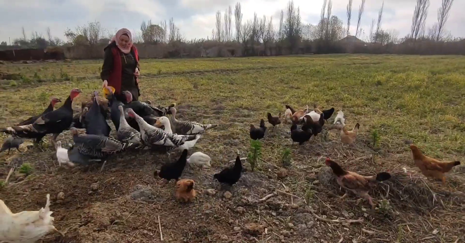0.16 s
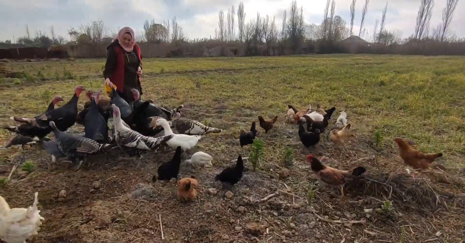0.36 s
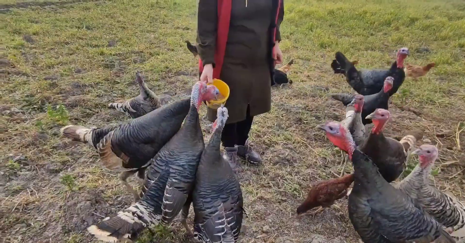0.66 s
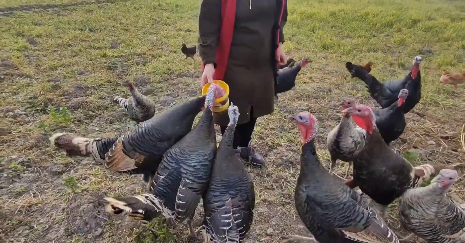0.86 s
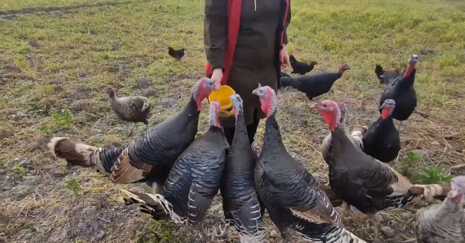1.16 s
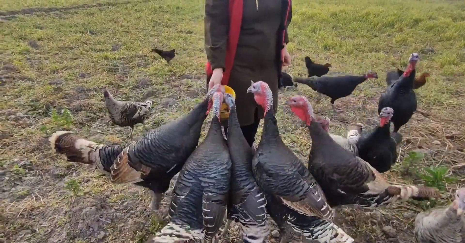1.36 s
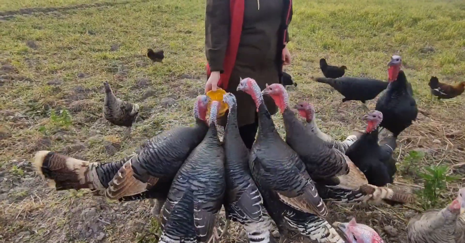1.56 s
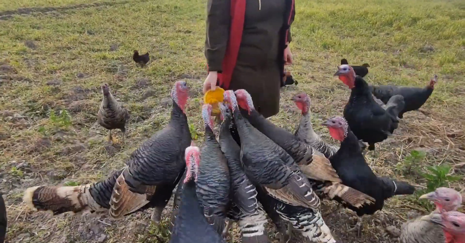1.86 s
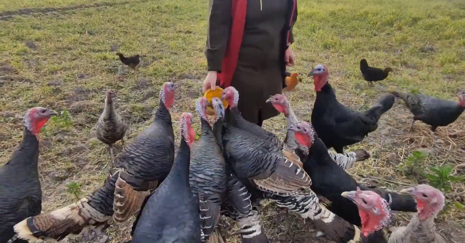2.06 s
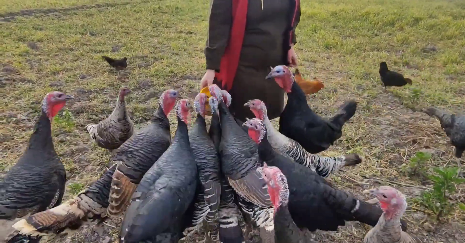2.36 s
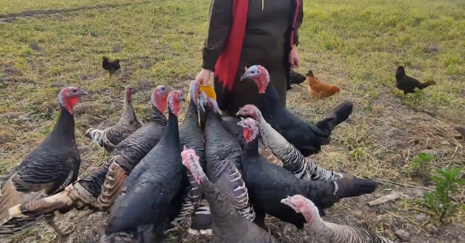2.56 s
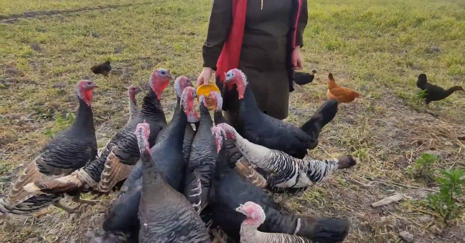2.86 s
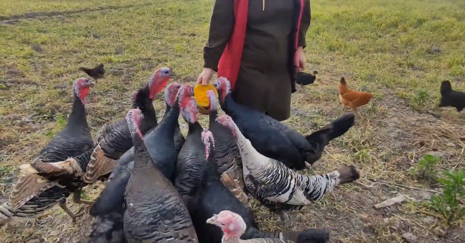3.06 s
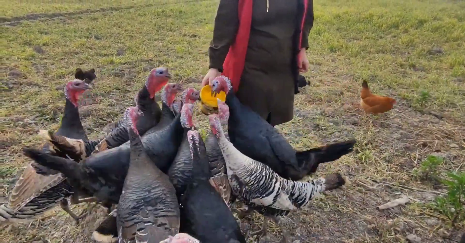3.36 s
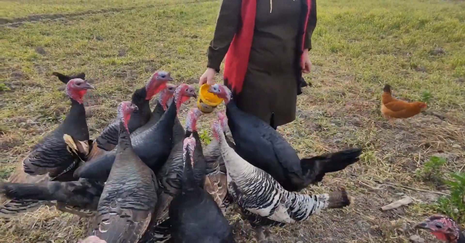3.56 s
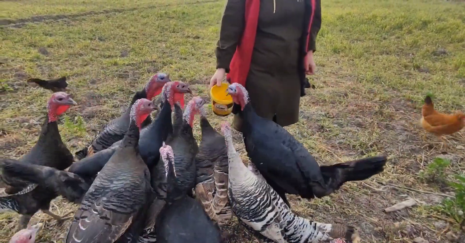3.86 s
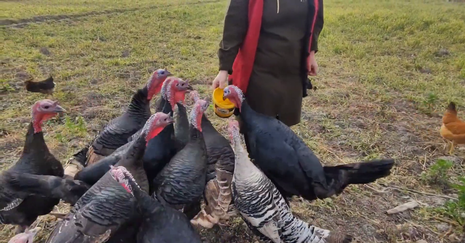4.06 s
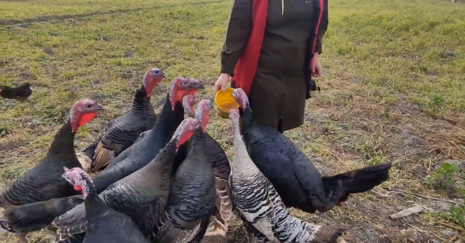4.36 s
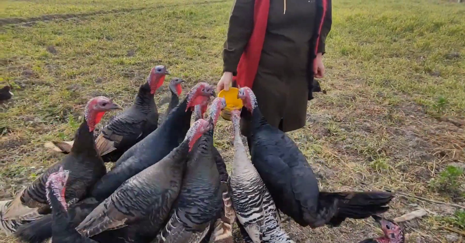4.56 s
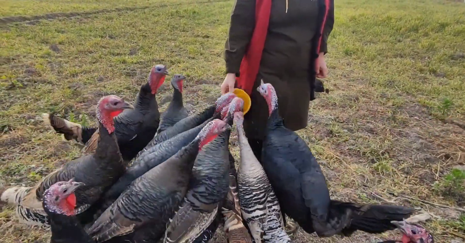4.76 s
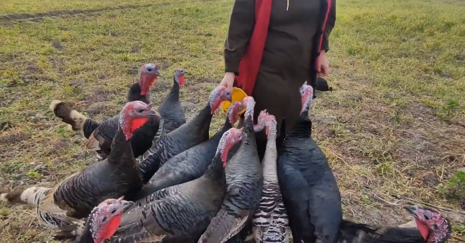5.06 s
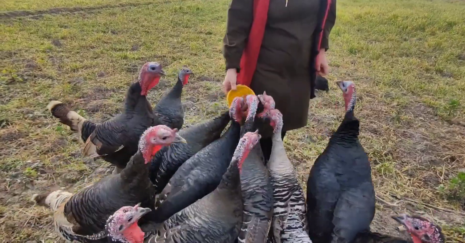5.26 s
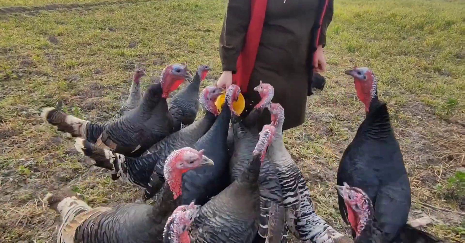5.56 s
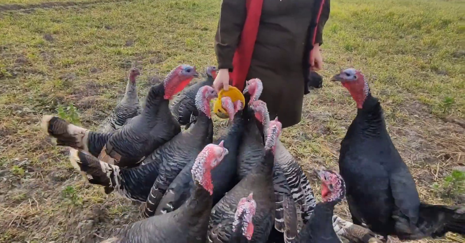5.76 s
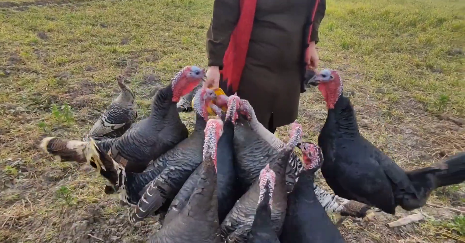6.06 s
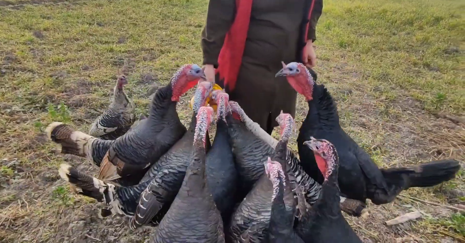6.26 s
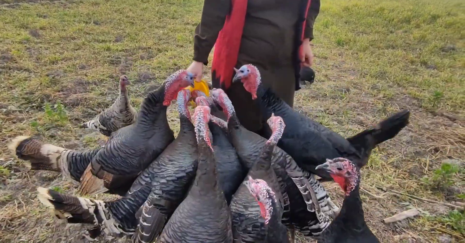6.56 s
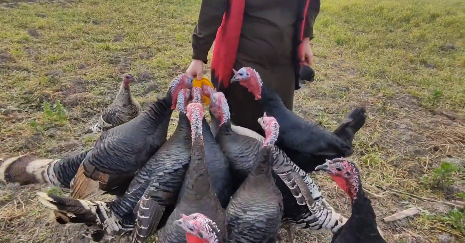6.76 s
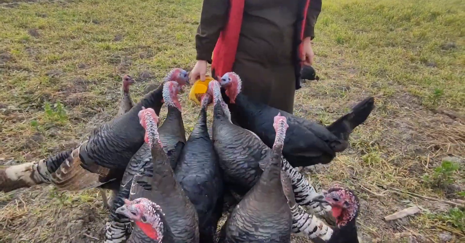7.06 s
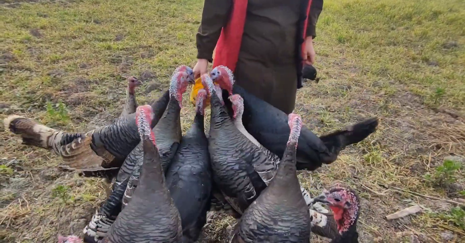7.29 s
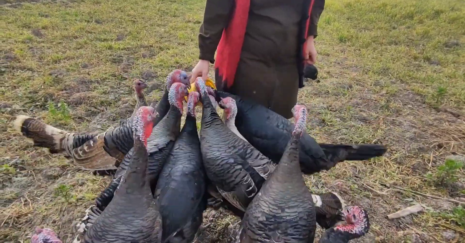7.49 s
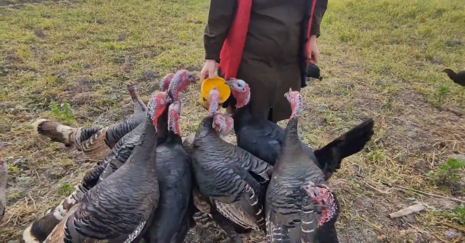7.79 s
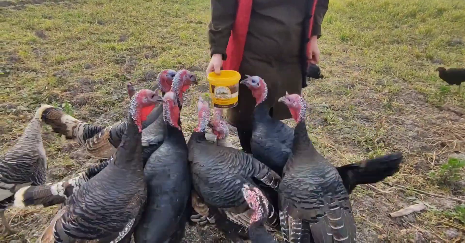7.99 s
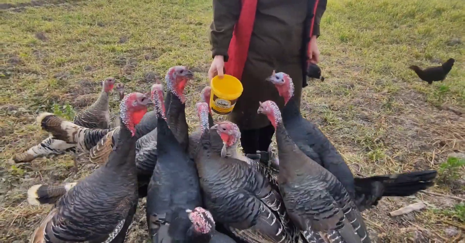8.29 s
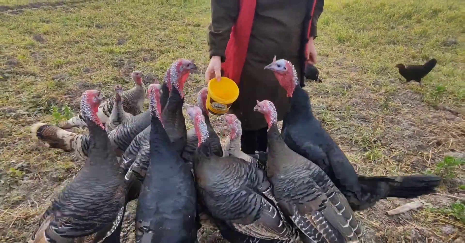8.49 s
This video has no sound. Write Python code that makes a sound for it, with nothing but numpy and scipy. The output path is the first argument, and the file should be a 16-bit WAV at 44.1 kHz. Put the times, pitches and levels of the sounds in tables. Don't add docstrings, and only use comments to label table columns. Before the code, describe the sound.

Close, wide stereo view of turkeys feeding in the open. Brief bright chirps, whistles, barked notes and throaty yelps overlap in bursts, strongest around two, five and six and a half seconds, thinning later. A few low clucks, sharp plastic pecks and dull thuds punctuate them. Scratchy dry-grass scuffs and feather rustle continue over low wind, a passing far motor and very faint high whines.

```python
import sys
import numpy as np
from scipy import signal
from scipy.fft import rfft, irfft
from scipy.io import wavfile
from scipy.ndimage import uniform_filter1d, map_coordinates

SR = 44100
rng = np.random.default_rng(int(sys.argv[2]) if len(sys.argv) > 2 else 0)


def transcribe(u):
    v = np.clip(np.atleast_2d(u).T, -1, 1)
    q = np.round(v * 32767).astype(np.int16)
    wavfile.write(sys.argv[1], SR, q)


def undo_db(level):
    steps = np.asarray(level, float) / 20
    return 10 ** steps


N = 380583

# (frequency [Hz], level [dB])
THROAT_TONE = [(380, -32), (640, -7), (1400, 3), (2100, -7), (3200, -17), (4200, -13), (7000, -60)]


def unit(x):
    return x / np.sqrt(np.mean(x ** 2) + 1e-20)


def along(points, hz):
    f, v = np.transpose(points)
    return np.interp(np.log(hz + 1), np.log(f + 1), v)


def wobble(rate, size):
    knots = rng.standard_normal(int(size * rate / SR) + 4)
    return map_coordinates(knots, [np.arange(size) * rate / SR])


def smooth_patch(x, bins, frames):
    return uniform_filter1d(uniform_filter1d(x, size=bins, axis=-2), size=frames, axis=-1)


def during(spans, t):
    return sum(1. * (t > a) * (t < b) for a, b in spans)


def rush(spectrum, patchy_db, roam_ms=0):
    # (frequency [Hz], correlation [0-1])
    likeness = [(60, .97), (300, .9), (1200, .5), (4000, .65)]
    hz, _, z = signal.stft(rng.standard_normal((2, N)), SR, nperseg=1024)
    patches = unit(smooth_patch(rng.standard_normal(z.shape[1:]), 14, 4))
    turn = np.arccos(np.clip(along(likeness, hz), -1, 1))[:, None] / 2
    z = z * undo_db(along(spectrum, hz)[:, None] + patchy_db * patches) * [np.cos(turn), np.sin(turn)]
    roam = roam_ms / 1000 * wobble(rate=4, size=N + SR)[::512][:z.shape[2]]
    shift = np.exp(1j * np.pi * hz[:, None] * roam)
    pair = np.array([(z[0] + z[1]) * shift, (z[0] - z[1]) / shift])
    return unit(signal.istft(pair, SR, nperseg=1024)[1][:, :N])


def add(out, s, sound):
    at = max(round(s * SR), 0)
    out[:, at:at + sound.shape[1]] += sound[:, :N - at]


def turkeys():
    # (time [s], length [s], start pitch [Hz], level [dB])
    rises = [(2.898, 0.021, 686, -30.5), (2.864, 0.017, 880, -27.5), (.47, 0.031, 850, -27),
             (.268, 0.02, 628, -37.5), (1.243, 0.024, 657, -34.5), (3.727, 0.02, 853, -24),
             (4.818, 0.017, 639, -30.5), (.533, 0.024, 860, -24.5), (.763, 0.04, 626, -33.5),
             (.87, 0.047, 813, -36.5), (1.098, 0.039, 694, -26), (3.668, 0.023, 888, -22.5),
             (6.322, 0.013, 1100, -22), (1.577, 0.035, 810, -19), (2.105, 0.022, 870, -15),
             (2.119, 0.021, 880, -22.5), (2.609, 0.023, 718, -33), (3.017, 0.026, 923, -18.5),
             (3.766, 0.038, 905, -19), (3.985, 0.024, 916, -18.5), (4.035, 0.023, 893, -20.5),
             (5.095, 0.029, 868, -14.5), (5.148, 0.027, 904, -13), (5.631, 0.026, 712, -30),
             (5.816, 0.042, 1096, -23), (6.137, 0.018, 613, -25.5), (6.406, 0.033, 898, -15),
             (6.465, 0.029, 942, -15), (8.4, 0.023, 882, -17), (8.464, 0.02, 900, -18.5)]
    lifts = [(.708, 0.035, 714, -26), (4.785, 0.028, 994, -35), (1.76, 0.014, 1450, -18.5),
             (2.0, 0.028, 994, -15), (2.055, 0.025, 941, -13), (2.717, 0.038, 870, -34),
             (2.821, 0.043, 714, -24), (2.902, 0.036, 990, -23), (8.545, 0.078, 1325, -39.5),
             (3.93, 0.038, 1052, -20.5), (1.315, 0.035, 1010, -22.5), (5.277, 0.019, 1086, -25),
             (6.344, 0.033, 1025, -15.5), (6.533, 0.026, 1076, -23), (8.098, 0.02, 694, -33.5)]
    flicks = [
        (3.063, 0.022, 877, -19),
        (5.886, 0.024, 804, -23.5),
        (7.164, 0.0159, 752, -27.5),
        (7.71, 0.018, 753, -38.5),
    ]
    soars = [
        (3.195, 0.02, 1022, -24),
        (7.92, 0.012, 664, -35),
    ]
    flats = [(.03, 0.098, 2330, -38), (1.448, .044, 1220, -16), (2.35, 0.069, 1510, -40.5),
             (2.692, 0.033, 1090, -35), (2.943, 0.028, 797, -31), (4.307, 0.06, 1730, -38),
             (5.13, 0.022, 1195, -24), (2.774, 0.054, 760, -28), (2.818, 0.0092, 1250, -20),
             (2.961, 0.022, 1040, -17), (3.71, 0.022, 1305, -31), (4.865, 0.049, 1532, -24),
             (5.293, 0.06, 1584, -32), (7.015, 0.013, 1300, -20.5), (8.378, .02, 1160, -35),
             (6.36, 0.12, 771, -38.5)]
    drops = [
        (6.488, 0.049, 2300, -26),
        (7.297, 0.024, 1770, -29),
        (4.4, .022, 1600, -34),
        (2.998, 0.05, 4100, -31.5),
    ]
    puts = [
        (4.097, 0.031, 657, -37.5),
        (4.358, 0.018, 733, -24.5),
        (4.417, 0.024, 718, -27.5),
        (4.476, 0.021, 710, -23.5),
        (5.276, 0.0042, 710, -24),
        (6.837, 0.014, 778, -28),
        (6.999, 0.013, 766, -24.5),
        (8.314, 0.0071, 707, -30.5),
    ]
    falls = [(1.66, 0.071, 1634, -25), (0.218, 0.041, 1860, -42), (1.802, 0.052, 2870, -30.5),
             (4.971, 0.062, 790, -33), (1.996, 0.045, 1630, -21), (2.124, 0.067, 1800, -27),
             (2.16, 0.015, 1180, -18.5), (2.803, 0.041, 1540, -15.5), (2.966, 0.026, 1324, -16),
             (5.04, 0.027, 1600, -36), (5.18, 0.03, 887, -27), (7.973, 0.063, 1650, -48),
             (6.518, 0.033, 1095, -27.5), (6.741, 0.024, 1560, -25.5), (8.2, 0.08, 862, -34)]
    # (time [s],
    # length [s], start pitch [Hz], end pitch [Hz], level [dB])
    crossings = [(0.173, 0.017, 1650, 1600, -37), (.24, 0.054, 1765, 1575, -40.5),
                 (0.293, 0.073, 1297, 652, -43.5), (0.342, 0.06, 1475, 1276, -44.5),
                 (0.396, 0.016, 970, 960, -35), (0.458, 0.012, 1045, 1770, -23.5),
                 (0.494, 0.017, 657, 577, -40), (0.664, 0.03, 750, 1080, -41),
                 (0.672, 0.036, 1260, 777, -40), (0.803, 0.034, 1335, 1540, -41),
                 (1.766, 0.0061, 2630, 2920, -34), (0.946, 0.019, 1925, 2010, -34),
                 (0.933, 0.019, 910, 980, -43), (.996, 0.014, 940, 980, -30),
                 (1.042, 0.018, 894, 960, -33.5), (1.062, 0.017, 1390, 1590, -29),
                 (1.093, 0.045, 1396, 1560, -31.5), (1.216, 0.012, 1280, 1330, -38),
                 (1.42, 0.038, 1840, 1540, -31), (1.492, 0.028, 1140, 1100, -30),
                 (1.575, 0.034, 1695, 1910, -32), (1.612, 0.011, 1640, 1570, -22),
                 (1.616, 0.019, 970, 1180, -22), (1.639, 0.015, 877, 750, -19.5),
                 (1.643, 0.0092, 1510, 1470, -27.5), (1.652, 0.01, 1120, 1420, -23),
                 (1.676, 0.025, 905, 1000, -31.5), (1.67, 0.02, 1770, 1730, -29.5),
                 (1.762, 0.037, 590, 920, -34), (1.956, 0.013, 1560, 1790, -26),
                 (1.971, 0.038, 2070, 1910, -35), (1.968, 0.029, 1060, 980, -27.5),
                 (2.081, 0.0087, 1280, 1600, -27), (2.089, 0.0078, 1180, 1830, -22),
                 (2.104, .03, 1880, 2020, -37), (2.157, 0.02, 880, 1270, -27),
                 (2.194, 0.014, 1090, 804, -31), (1.53, .024, 870, 1060, -12.5),
                 (4.932, 0.013, 2940, 2870, -30), (5.313, .045, 3160, 3010, -41.5),
                 (3.627, 0.04, 1046, 1163, -29.5), (3.72, 0.1, 2500, 2370, -40),
               (3.844, 0.041, 2540, 2850, -31.5), (3.914, 0.012, 1850, 1760, -32),
               (3.912, 0.017, 833, 950, -33), (3.93, .02, 2550, 2540, -37), (4.215, 0.03, 705, 945, -38),
               (4.345, 0.017, 950, 890, -36), (4.42, 0.027, 1670, 1830, -27),
               (4.443, 0.012, 1190, 1410, -31), (4.499, 0.012, 1260, 1225, -27),
               (4.498, 0.016, 1680, 1850, -31.5), (4.977, 0.033, 1497, 1330, -30.5),
               (5.07, .025, 1174, 1130, -39), (5.19, 0.028, 1360, 1250, -36),
               (5.22, 0.031, 1074, 1030, -47), (5.396, 0.018, 1460, 706, -33),
               (8.217, 0.03, 1566, 1260, -37), (8.424, 0.01, 1500, 900, -32), (6.07, 0.014, 724, 970, -31),
               (6.072, 0.026, 1140, 1940, -34.5), (6.099, 0.027, 2380, 2210, -34),
               (6.108, 0.039, 2010, 1480, -33), (6.151, 0.035, 1534, 1110, -27),
               (6.336, 0.021, 1894, 1420, -31), (6.46, 0.032, 1997, 2130, -28),
               (6.464, 0.01, 1260, 1440, -26), (6.53, 0.039, 852, 640, -31.5),
               (6.948, 0.012, 1440, 1150, -31), (7.058, 0.019, 1574, 1250, -21.5),
               (7.13, 0.031, 1410, 1290, -34), (7.231, 0.023, 1604, 1200, -26),
               (2.815, 0.027, 2020, 2220, -32), (2.68, 0.025, 2700, 2430, -42),
               (2.96, .045, 3580, 3550, -30)]
    # (time [s], length [s], pitch [Hz], level [dB], sag [octaves])
    hooked = [(0.797, 0.058, 729, -33.5, 0.073), (1.366, 0.046, 1048, -16.5, -0.049),
              (1.816, 0.12, 950, -26, 0.099), (1.831, 0.15, 619, -29.5, -0.22),
              (2.64, 0.054, 1070, -36.5, -0.19), (3.434, 0.16, 991, -26.5, 0.11),
              (3.817, 0.095, 704, -22.5, -0.63), (4.238, 0.08, 1098, -24, -0.052),
              (6.198, 0.14, 1640, -37, 0.44), (4.829, 0.14, 939, -24, 0.089),
              (5.001, 0.063, 1046, -15, 0.18), (5.658, 0.09, 1190, -29, 0.22),
              (6.156, 0.17, 1056, -19.5, 0.21), (8.124, 0.15, 1030, -26.5, 0.14),
              (8.306, 0.064, 1133, -17.5, 0.29)]
    dropped = [(0.117, 0.089, 2305, -37.5, 0.38), (1.608, 0.13, 768, -34.5, 0.19),
               (1.767, 0.059, 1956, -24, 0.1), (1.828, 0.094, 1764, -22.5, 0.19),
               (7.026, 0.05, 1640, -25.5, 0.11), (7.074, 0.071, 1267, -35, 0.44),
               (5.303, 0.11, 1436, -31, 0.61), (6.597, 0.15, 1138, -34.5, 0.36),
               (6.852, 0.1, 1250, -28.5, 0.28), (6.959, 0.074, 1210, -32.5, 0.094),
               (7.026, 0.074, 691, -32, -0.0021), (7.17, 0.06, 1432, -29.5, 0.28),
               (7.226, 0.036, 798, -29, 0.07)]

    out = np.zeros((2, N))
    middle = 0.49
    # notes, end pitch over start pitch, overtone slope dB/octave, swell lateness
    kinds = [(rises, 1.38, -8, 1.47), (lifts, 1.12, -8, 1.47), (flicks, 2.01, -11, 1.47),
             (soars, 2.7, -11, 1.03), (flats, 0.93, -8, 1.03), (drops, 0.63, -11, 1.03)]
    for notes, glide, slope_db, late in kinds:
        for s, length, hz, db in notes:
            add(out, s, chirp(length, hz, hz * glide, db, lead(s), .025, slope_db, late))
    for s, length, hz, db in puts:
        add(out, s, chirp(length, hz, hz * 1.086, db, lead(s), .025, -5.5, late=1, second_db=5.5))
    for s, length, hz, end_hz, db in crossings:
        add(out, s, chirp(length, hz, end_hz, db, middle * lead(s), .03, -11, late=1.03))
    for s, length, hz, db in falls:
        end_hz = hz * 2 ** (-8.5 * length)
        add(out, s, chirp(length, hz, end_hz, db, middle * lead(s), .025, -11, late=1.03))
    for s, length, hz, db, sag in hooked:
        add(out, s, yelp(length, hz, db, sag, turn=0.55, turn_s=0.0184, swell_db=-6.5,
                         slope_db=-8, lead_ms=lead(s)))
    for s, length, hz, db, sag in dropped:
        add(out, s, yelp(length, hz, db, sag, turn=-0.533, turn_s=0.0288, swell_db=3,
                         slope_db=-12, lead_ms=lead(s)))
    return open_beak(out)


def lead(s):
    # (time [s], left lead [ms])
    places = [(0, -0.2), (.55, -0.46), (.7, 0.39), (1.15, 0.49), (1.55, 0.18), (1.75, -0.032),
              (1.92, -0.46), (1.98, 0.29), (2.2, 0.18), (2.55, -0.14), (3.85, -0.29), (4.3, -0.018),
              (5.15, -0.28), (5.3, -0.024), (5.8, 0.18), (6.1, 0.077), (7.2, -0.17), (8.6, -0.15)]
    return np.interp(s, *np.transpose(places))


def chirp(length, from_hz, to_hz, db, lead_ms, rough, slope_db, late, second_db=0):
    u = np.linspace(0, 1, int(1.12 * length * SR) + 2)
    path = u ** 2 + 1 / 6 if to_hz > from_hz else u
    swell = abs(np.sin(np.pi * u ** late)) ** 0.59
    hz = from_hz * (to_hz / from_hz) ** path
    return sing(hz, undo_db(db + 1) * swell, lead_ms, rough, slope_db, second_db)


def yelp(length, hz, db, sag, turn, turn_s, swell_db, slope_db, lead_ms):
    t = np.arange(0, length, 1 / SR)
    last = np.clip(1 - (length - t) / turn_s, 0, 1)
    scoop = -0.2104 * np.exp(-t / 0.00793)
    octaves = scoop - sag * t / length + turn * last ** 2
    edge = np.clip(np.minimum(t, length - t) / 0.0058, 0, 1)
    gain = edge * undo_db(db + swell_db * (1 - t / length))
    return sing(hz * 2 ** octaves, gain, lead_ms, rough=.018, slope_db=slope_db)


def sing(hz, gain, lead_ms, rough, slope_db, second_db=0):
    size = len(hz)
    turning = np.minimum(abs(np.gradient(np.log2(hz))) * SR / 20, 1)
    slope_db = slope_db - 10 * turning
    hz = hz * (1 + rough * wobble(rate=160, size=size))
    gain = gain * undo_db(38 * rough * wobble(rate=100, size=size))
    port_s = np.array([[.5], [-.5]]) * lead_ms / 1000
    phase = 2 * np.pi * (np.cumsum(hz) / SR + hz * port_s)
    orders = np.arange(1, 7)[:, None, None]
    flicker_db = slope_db + rng.normal(0, 1.5) + 1.5 * wobble(rate=190, size=size)
    throat_db = along(THROAT_TONE, orders * hz) - along(THROAT_TONE, hz)
    shape = undo_db(throat_db + flicker_db * np.log2(orders) + second_db * (orders == 2))
    return np.sqrt(2) * gain * (shape * np.sin(orders * phase)).sum(axis=0)


def open_beak(x):
    # (from [s], to [s])
    gapes = [
        (1.525, 1.56),
        (3.76, 3.81),
        (4.36, 4.5),
        (5.0, 5.18),
        (6.4, 6.435),
    ]
    wide = uniform_filter1d(during(gapes, np.arange(N) / SR), size=300)
    peak = np.exp(-((np.fft.rfftfreq(N, 1 / SR) - 3800) / 700) ** 2)
    return x + (undo_db(10) - 1) * wide * irfft(rfft(x) * peak, N)


def crowd(near):
    peeps = np.zeros((2, N))
    for s, size, pitch, glide, place, faint in rng.random((700, 6)):
        hz = 820 * 2.5 ** pitch
        end_hz = hz * 2 ** (0.725 * glide - .45)
        add(peeps, s * N / SR, chirp(.005 + 0.013 * size, hz, end_hz, -6 * faint, 0.57 * place - .3,
                                     rough=0.075, slope_db=-11, late=1.76))
    breath = rush(np.multiply(THROAT_TONE, [1, 2.6]), patchy_db=3)
    busy = np.sqrt(abs(uniform_filter1d((near ** 2).mean(axis=0), size=1800)))
    return busy * (undo_db(-13) * unit(peeps) + undo_db(-18) * breath)


def hens():
    # (time [s], length [s], pulse rate [Hz], level [dB])
    clucks = [
        (1.177, .026, 205, -22),
        (2.72, .035, 290, -30),
        (3.95, .03, 340, -30),
    ]
    out = np.zeros((2, N))
    t = np.arange(SR // 50) / SR
    ring = np.zeros(len(t))
    for hz, db, t60 in [(248, 4.0, 0.0079), (750, 5.6, 0.015), (1210, 4, 0.019)]:
        ring += undo_db(db - 60 * t / t60) * np.sin(2 * np.pi * hz * t)
    ring *= np.minimum(t * 2000, 1)
    for s, length, hz, db in clucks:
        pulses = np.zeros(int(length * SR))
        pulses[::int(SR / hz)] = 1
        swell = np.sin(np.linspace(.4, 2.6, len(pulses))) ** 2.8
        add(out, s, undo_db(db + 4.5) * np.convolve(pulses * swell, ring) * np.ones((2, 1)))
    return out


def pecks():
    # (time [s], peak level [dB], ring [Hz])
    blows = [(.462, -31, 4500), (.577, -16.5, 3330), (.5831, -16, 2600), (.679, -24, 3800),
             (.7262, -27, 5500), (.815, -11, 4640), (.839, -27, 4300), (3.5194, -28, 5500),
             (4.2472, -17, 5200), (4.5563, -27.5, 5700), (4.9013, -29, 5500), (5.084, -21, 3250),
             (5.5177, -19, 4320), (5.6209, -11, 3260), (6.0584, -23, 4000), (6.1484, -25, 4500),
             (6.302, -26, 3000), (7.1102, -27, 5000), (7.422, -20, 6500), (7.875, -31, 3000),
             (8.006, -15, 1320), (8.4587, -31, 7000)]
    out, t = np.zeros((2, N)), np.arange(SR // 25) / SR
    for s, db, hz in blows:
        ring = undo_db(-60 * t / 0.0066) * np.sin(2 * np.pi * hz * t)
        scratch = uniform_filter1d(rng.standard_normal((2, len(t))), size=2)
        crack = 0.65 * undo_db(-60 * t / 0.016) * scratch
        add(out, s, undo_db(db + 2.0) * (ring + crack) * (1 - np.exp(-t / 0.00058)))
    return out


def thuds():
    # (time [s], peak level [dB], frequency [Hz])
    pushes = [(0.58, -35, 605), (2, -39, 310), (3.157, -35.5, 250), (7.678, -40.5, 220),
              (7.874, -35.5, 340), (4.256, -35, 400), (6.919, -39.5, 352), (7.422, -41.5, 550),
              (7.798, -42, 290), (2.085, -38, 420), (6.905, -39, 340), (7.758, -44, 240), (2, -42.5, 320),
              (2.987, -35.5, 350), (2.8, -40, 320), (1.53, -37, 537)]
    out, t = np.zeros((2, N)), np.arange(SR // 25) / SR
    for s, db, hz in pushes:
        decay = undo_db(db + 15 - 60 * t / 0.032)
        push = decay * np.sin(2 * np.pi * hz * t) * (1 - np.exp(-t / 0.00092))
        add(out, s, push * np.ones((2, 1)))
    return out


def rustle():
    # (time [s], level [dB], decay t60 [s])
    stir = [(.03, -47, 1.4), (.46, -45, 0.37), (.6, -48, 1.4), (1.76, -39.5, 0.68), (2.81, -40.5, 0.17),
            (4.56, -62, 1.6), (7.4, -53, 1.3), (0.716, -37, 0.4), (0.988, -35, 0.66), (1.07, -45.5, 2.6),
            (1.29, -46, 2.5), (1.504, -37, 1.07), (1.8, -40, 5.6), (2.05, -32, 0.44), (2.26, -41.5, 1.7),
            (2.62, -45.5, 1.4), (2.945, -38, 2.06), (3.455, -39, 1.6), (3.679, -38, 0.16),
            (4.228, -34, 0.71), (4.86, -39, 1.16), (5.079, -40.5, 0.85), (5.359, -43, 1.5),
            (5.603, -35.5, 0.7), (5.655, -37, 0.34), (5.782, -36.5, 1.53), (6.13, -36, 0.78),
            (6.598, -41, 0.64), (6.9, -47.5, 5.5), (7.101, -37, 0.87), (7.547, -43, 1.1), (7.756, -38, 1.6),
            (7.972, -38, 0.21),]
    # (frequency [Hz], density [dB per Hz])
    grass = [(190, -21), (600, -12), (1050, -15.5), (1600, -10.5), (4800, -10), (5600, -18), (7300, -21),
             (8300, -15.5), (10000, -20.5), (12000, -15), (15800, -27)]
    s, db, t60 = np.transpose(stir)
    ticks = np.arange(0, N / SR, .002)
    since = np.maximum(ticks[:, None] - s, 0)
    decay_db = 60 * np.maximum(since - 0.031, 0) / t60
    scuffs = undo_db(db - 3.0 - decay_db) * np.clip(since / 0.012, 0, 1)
    floor = undo_db(-56.5)
    level = np.interp(np.arange(N) / SR, ticks, np.sqrt((scuffs ** 2).sum(axis=1) + floor ** 2))
    crackle = undo_db(1.74 * wobble(rate=360, size=N) + 1.2 * wobble(rate=24, size=N))
    return undo_db(7.0) * level * unit(crackle * rush(grass, patchy_db=2.5, roam_ms=.12))


def field():
    # (time [s], level [dB])
    rumble = [
        (0, -56),
        (1.6, -47.5),
        (3.9, -48),
        (4.7, -48.5),
        (8.63, -51.5),
    ]
    # (frequency [Hz], density [dB per Hz])
    air = [(15, -51), (25, -14.5), (140, -5.5), (466, -7), (629, -5), (866, -16), (3000, -28), (3900, -68),
           (6600, -120)]
    level_db = np.interp(np.arange(N) / SR, *np.transpose(rumble))
    return undo_db(level_db + 1.5 * wobble(rate=9, size=N)) * rush(air, patchy_db=1.3)


def whines():
    # (frequency [Hz], level [dB])
    tones = [(11542, -63), (13609, -66)]
    # (from [s], to [s])
    spells = [
        (.2, 1.7),
        (6.8, 9.5),
    ]
    t = np.arange(N) / SR
    out = np.zeros((2, N))
    on = uniform_filter1d(during(spells, t), size=2000)
    for hz, db in tones:
        out[0] += on * undo_db(db + 1.5 + 2.5 * wobble(rate=59, size=N)) * np.sin(2 * np.pi * hz * t)
    return out


def engine():
    # (time [s], level [dB])
    passing = [
        (1.5, -71),
        (1.8, -57.5),
        (3.2, -55.5),
        (4.3, -53.5),
        (4.7, -72),
        (8.63, -72),
    ]
    # (frequency [Hz], density [dB per Hz])
    drone = [(30, -36), (58, -6), (72, 9), (90, 0), (160, -34), (400, -120)]
    hz = np.fft.rfftfreq(N, 1 / SR)
    a, b = irfft(rfft(rng.standard_normal((2, N))) * undo_db(along(drone, hz)), N)
    level = undo_db(np.interp(np.arange(N) / SR, *np.transpose(passing)))
    return level * unit(np.array([a + 0.15 * b, a - 0.13 * b]))


def scene():
    near = turkeys()
    birds = near + crowd(near) + hens() + pecks() + thuds()
    t = np.arange(SR // 8) / SR
    tail = rng.standard_normal((2, len(t))) * undo_db(-60 * t / .09)
    echo = signal.fftconvolve(birds, tail / np.linalg.norm(tail[0]), axes=1)[:, :N]
    return birds + undo_db(-14) * echo + rustle() + field() + whines() + engine()


def roll_off(x):
    return signal.sosfilt(signal.butter(12, 16460, fs=SR, output="sos"), x)


def record(dry):
    hz = np.fft.rfftfreq(N, 1 / SR)
    treble_db = np.clip((hz - 10500) / 2500, 0, 1) * [[2.5], [-6]]
    ports = undo_db(([[.6], [-.6]] + treble_db) * (hz > 1800))
    ports = ports * (hz < 15800) / np.sqrt(1 + (66 / (hz + 1)) ** 4)
    return roll_off(irfft(rfft(dry) * ports, N))


dry = scene()
out = record(dry)
transcribe(out)
```